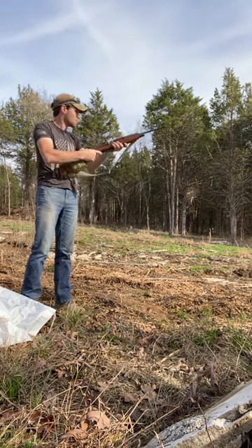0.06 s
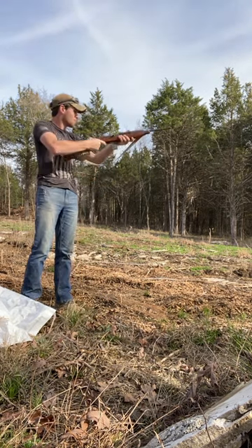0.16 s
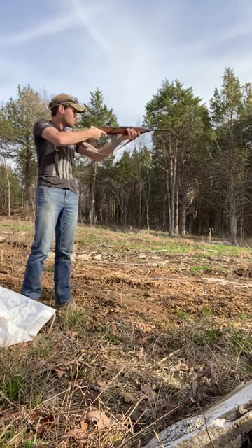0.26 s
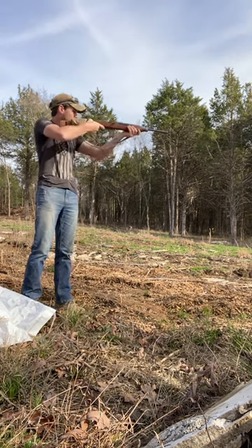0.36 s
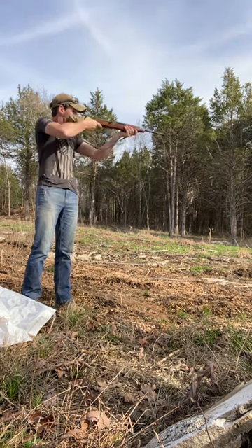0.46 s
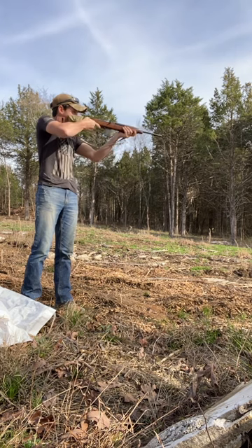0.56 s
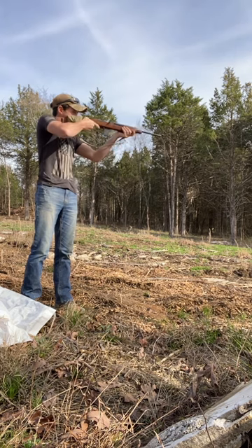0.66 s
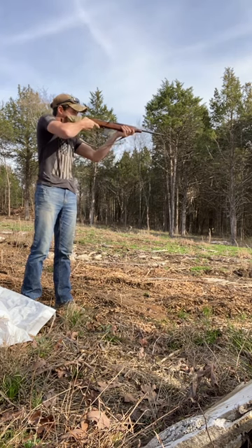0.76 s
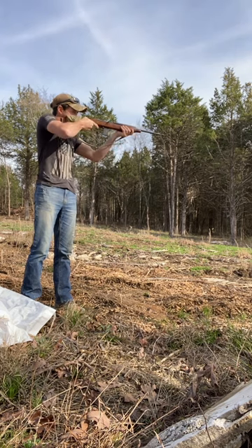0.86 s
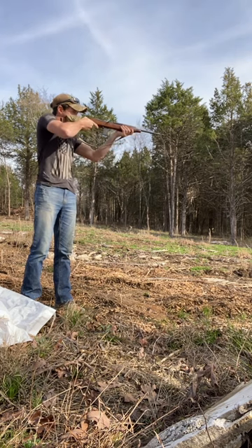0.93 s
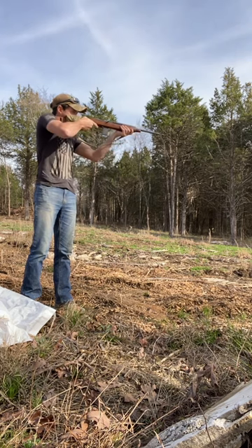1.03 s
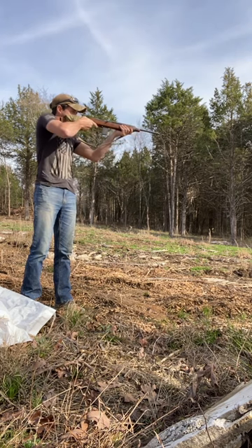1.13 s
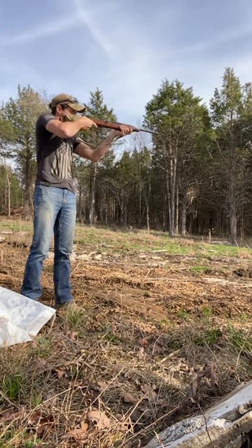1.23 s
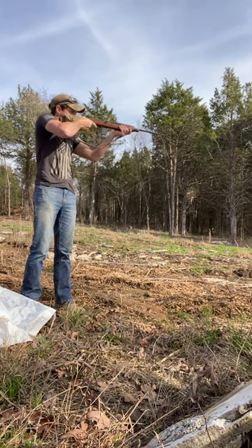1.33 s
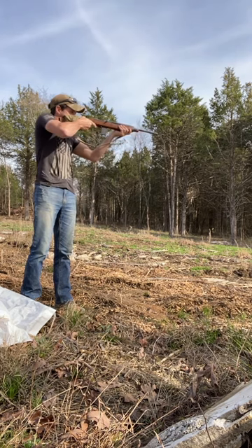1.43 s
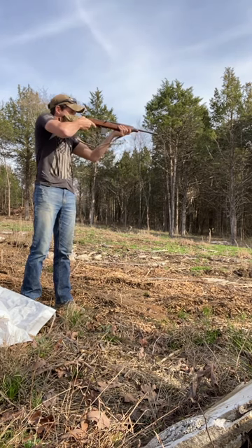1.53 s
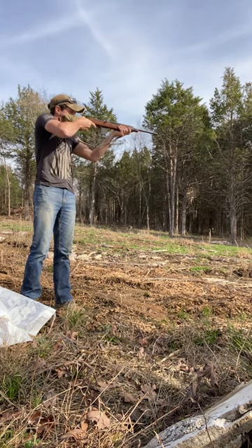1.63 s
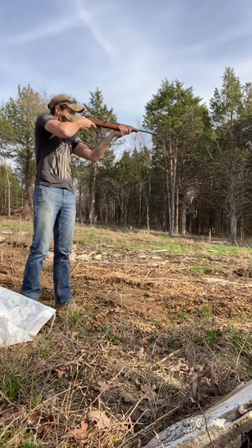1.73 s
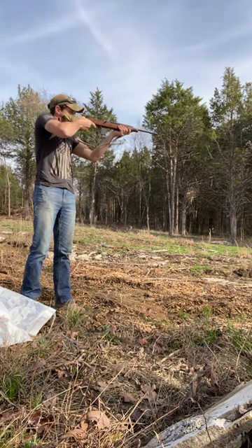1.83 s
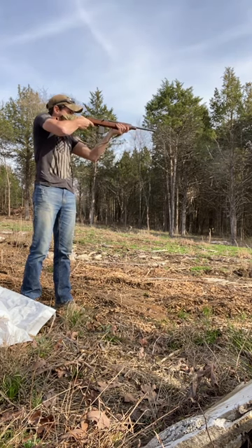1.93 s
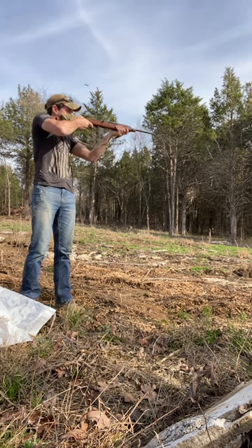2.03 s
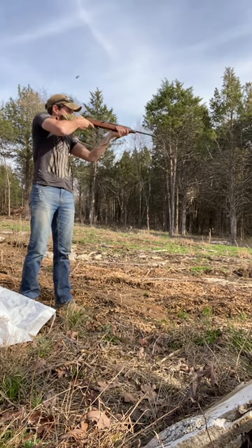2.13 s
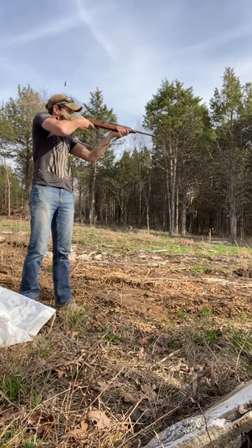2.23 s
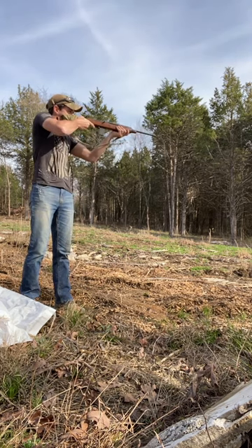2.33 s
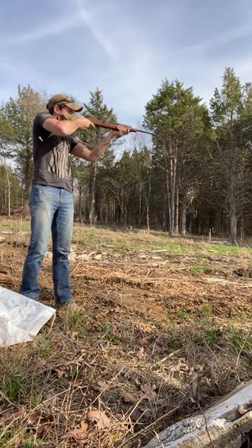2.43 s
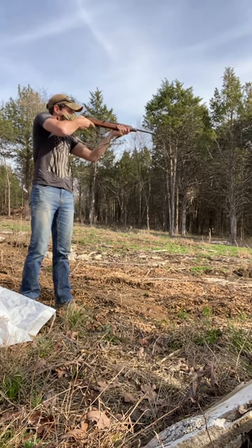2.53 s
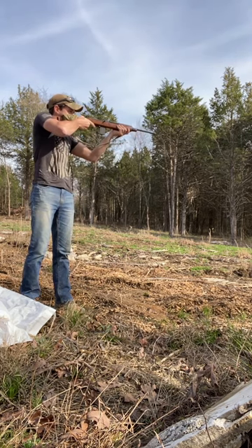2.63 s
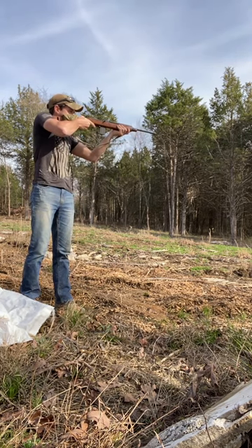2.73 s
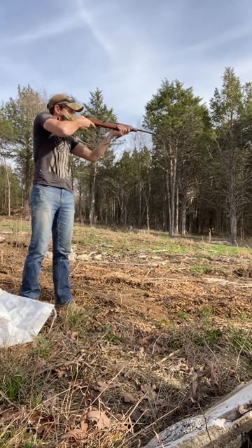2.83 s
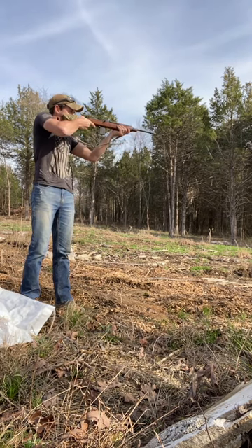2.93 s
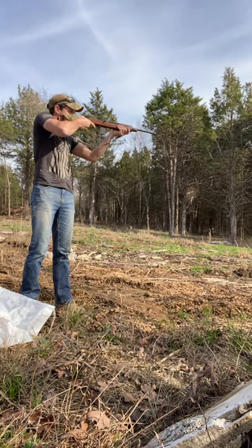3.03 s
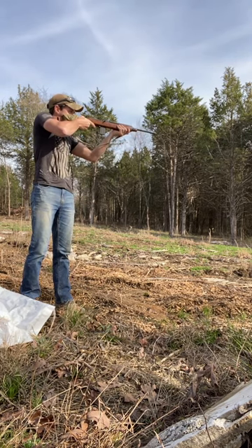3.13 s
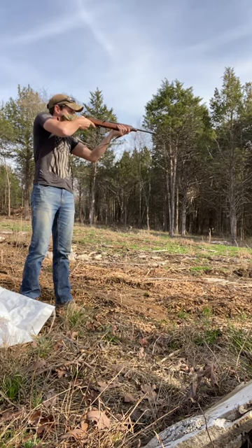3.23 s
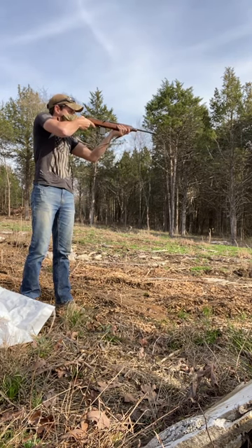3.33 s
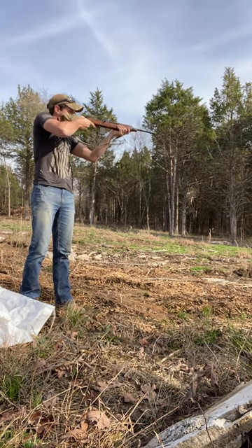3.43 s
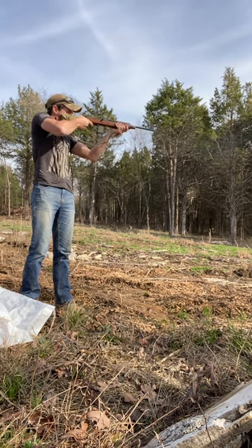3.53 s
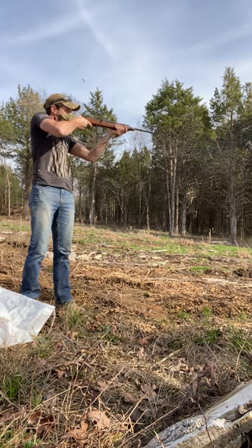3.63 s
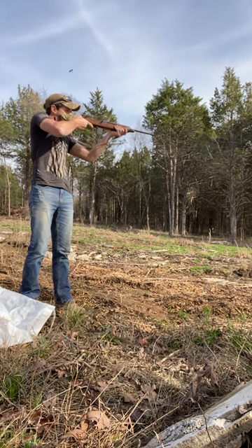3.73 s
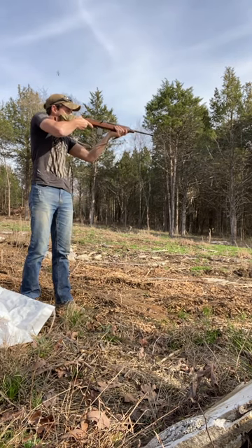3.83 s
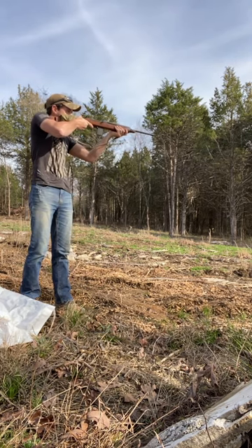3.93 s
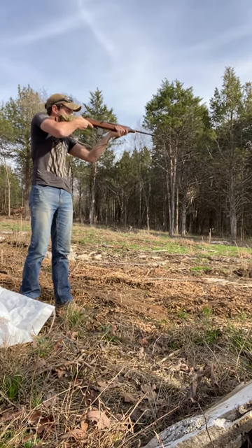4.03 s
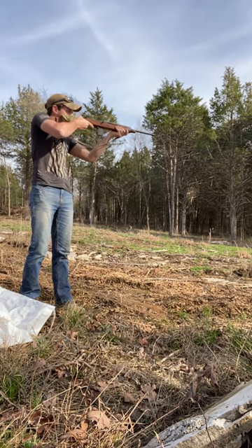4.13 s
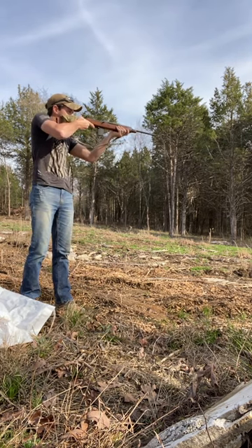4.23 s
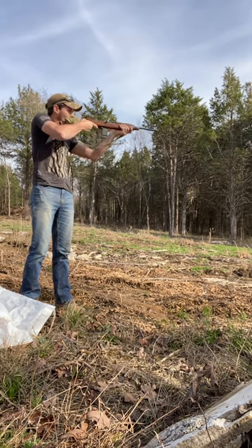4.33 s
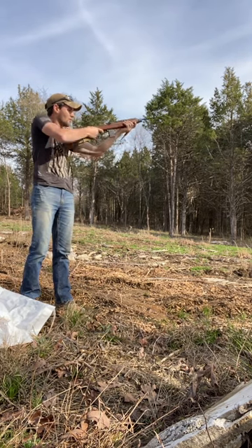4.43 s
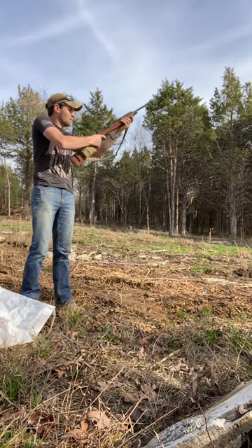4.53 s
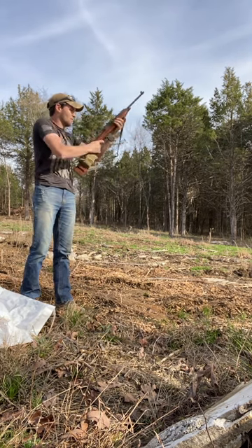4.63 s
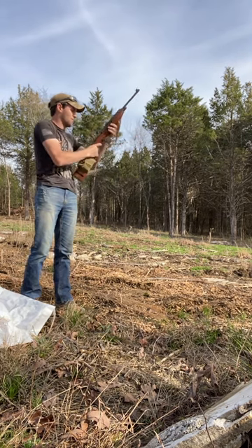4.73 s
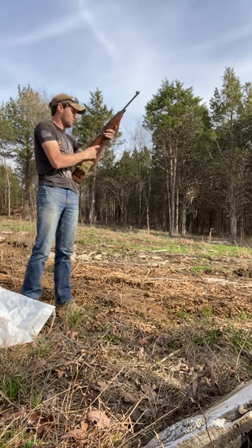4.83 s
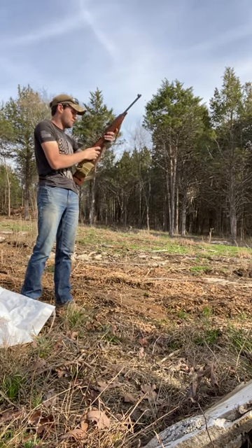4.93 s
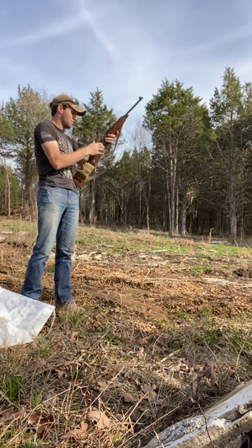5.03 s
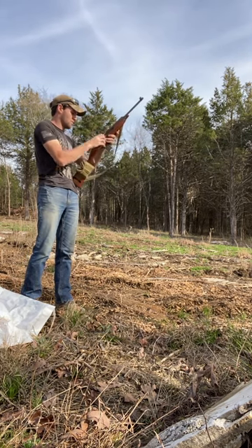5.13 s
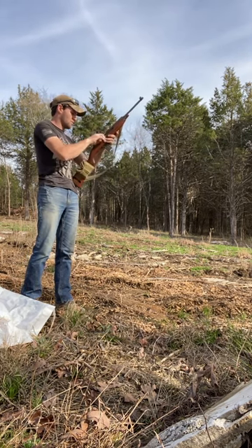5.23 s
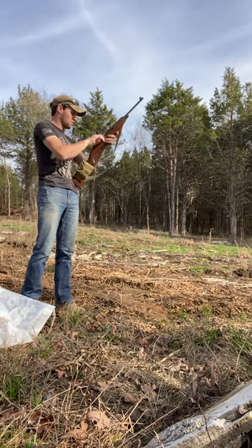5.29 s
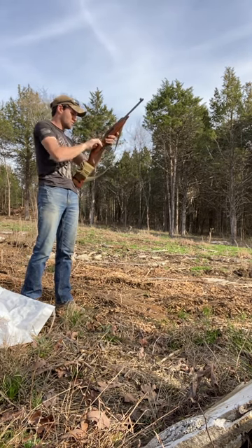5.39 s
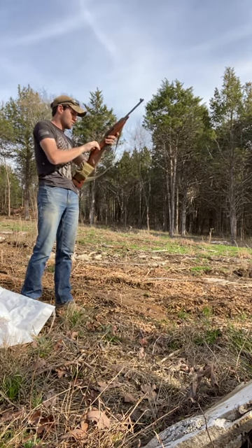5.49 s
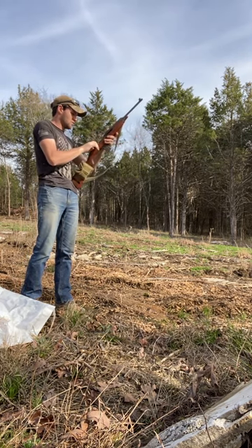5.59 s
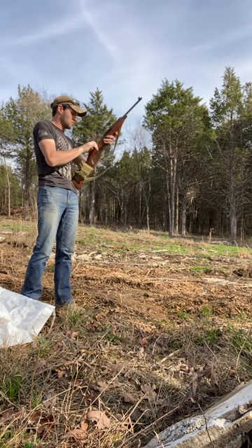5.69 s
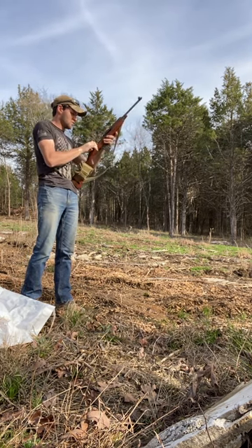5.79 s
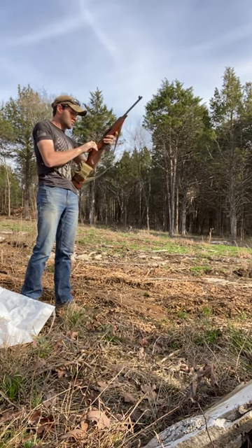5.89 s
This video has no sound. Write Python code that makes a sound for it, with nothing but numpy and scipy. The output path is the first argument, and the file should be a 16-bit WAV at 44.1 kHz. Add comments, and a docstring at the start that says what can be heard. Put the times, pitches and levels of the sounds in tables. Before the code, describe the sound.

A rifle is shouldered over low rumble, fires two sharp overloaded cracks with long dulling echoes, and its action clicks afterward.

```python
"""Over a low rumble, soft air and wind puffs (filtered noise), a rifle is shouldered: cloth slides, stock taps.
Two carbine shots sound, with one faint falling chirp before them and another after: each shot is a noise
swell with unsteady tones, a shock front and a thump, then a bolt snap, a ground tail, a long roll from the
woods that dulls with age and a hillside swell. Spent cases land as gritty noise with a thud, the first before
the second shot. At the end the rifle is lowered and its steel action clicks: noise snaps with damped modes."""
import sys
import numpy as np
from scipy import signal
from scipy.io import wavfile

SR = 44100
rng = np.random.default_rng(int(sys.argv[2]) if len(sys.argv) > 2 else 0)


def waveform_to_disk(signal):
    """Save audio, clipped to [-1, 1], as 16-bit WAV at the path in sys.argv[1]."""
    frames = np.transpose(np.atleast_2d(signal))
    scaled = np.clip(frames, -1, 1) * 32767
    samples = np.round(scaled).astype(np.int16)
    wavfile.write(sys.argv[1], SR, samples)


N = 262565   # samples
TIME_S = np.arange(N) / SR
EDGES_HZ = 20 * 2 ** np.arange(0, 9.7, 1 / 3)   # third octaves
CENTRES_HZ = np.sqrt(EDGES_HZ[1:] * EDGES_HZ[:-1])


def from_db(db):
    """Amplitude ratio of a level in dB."""
    return 10 ** (np.asarray(db) / 20)


def left_right(lean_db):
    """Left and right gains that differ by lean_db."""
    return from_db([[lean_db / 2], [-lean_db / 2]])


def at_bands(points):
    """A table over frequency, read at the band centres."""
    hz, value = np.transpose(points)
    return np.interp(np.log(CENTRES_HZ), np.log(hz), value)


def tilted(colour, tilt_db_per_octave):
    """A colour at the band centres with its treble raised or lowered."""
    return np.c_[CENTRES_HZ, at_bands(colour) + tilt_db_per_octave * np.log2(CENTRES_HZ)]


def band_gains(colour):
    """Gain of each band for a colour of total power 1."""
    hz, density_db = np.transpose(colour)
    log_hz_inside = np.linspace(np.log(EDGES_HZ[:-1]), np.log(EDGES_HZ[1:]), 9)
    density = from_db(np.interp(log_hz_inside, np.log(hz), density_db)) ** 2
    power = np.mean(density, axis=0) * np.diff(EDGES_HZ)
    return np.sqrt(power / power.sum())


def drift(knots_per_s, size):
    """Random wander with spread about 1, linear between random knots."""
    knots = rng.standard_normal(4096)
    return 1.2 * np.interp(np.arange(size) / SR * knots_per_s, np.arange(len(knots)), knots)


# Stereo width of noise. Each row: frequency in Hz, left-right correlation.
LIKENESS = [(60, 0.94), (130, 1), (280, 0.91), (600, 0.34), (1280, 0.85), (2760, -0.37), (5930, 0.87),
            (12700, -0.38)]


def noise_bands(size, shared=1.0):
    """Third-octave bands of stereo noise, rms 1 each; shared scales the left-right correlation."""
    run_in = 6000   # samples for the filters to settle
    white = rng.standard_normal((2, 2, size + run_in))
    for k, alike in enumerate(np.clip(shared * at_bands(LIKENESS), -.99, .99)):
        sos = signal.butter(2, EDGES_HZ[k:k + 2], "band", fs=SR, output="sos")
        mid, side = signal.sosfilt(sos, white[k % 2])[:, run_in:]
        band = np.sqrt(1 + alike) * mid + np.sqrt(1 - alike) * side * [[1], [-1]]
        yield band / band.std()


def noise(colour, size):
    """Stereo noise of one colour, rms about 1."""
    return sum(gain * band for gain, band in zip(band_gains(colour), noise_bands(size)))


def ring(t, hz, t60_s):
    """A sine that starts at t = 0 and loses 60 dB in t60_s."""
    t = np.maximum(t, 0)
    return np.sin(2 * np.pi * hz * t) * from_db(-60 * t / t60_s)


def swell(t, crest_s, build_s, dying_db_per_s, hold_s=0):
    """Builds up to 1 at the crest, holds, then dies at a steady rate."""
    rise = np.clip((t - crest_s) / build_s + 1, 0, 1) ** 2
    return rise * from_db(-dying_db_per_s * np.maximum(t - crest_s - hold_s, 0))


def contact(t, colour, rise_s, decay_s, tail_db, tail_s, grit_db=1.0):
    """A brief gritty touch with a faint tail from the ground around."""
    shape = np.exp(-np.maximum(t - rise_s, 0) / decay_s) + from_db(tail_db) * np.exp(-t / tail_s)
    grit = from_db(grit_db * drift(690, len(t)))
    return np.minimum(t / rise_s, 1) ** 2 * shape * grit * noise(colour, len(t))


def add(out, start_s, sound):
    """Mixes a sound in from the given time on."""
    i = int(start_s * SR)
    out[:, i:i + sound.shape[-1]] += sound[..., :N - i]


# Spectra of far rumble, air in the trees, wind puffs. Each row: frequency in Hz, density in dB per Hz.
RUMBLE_COLOUR = [(12, -48), (20, -21), (43, -11), (81, 4), (97, 0), (114, -15), (144, -6), (350, -30),
                 (460, -66), (770, -120)]
AIR_COLOUR = [(180, -28.5), (300, 3.5), (411, -17.5), (505, 1), (749, -13), (823, -7), (905, -10.5),
              (995, -11.5), (1250, -18.5), (1600, -34.5), (2090, -47), (2410, -28), (2910, -37.5),
              (6500, -38.5), (11500, -42), (13000, -57.5)]
PUFF_COLOUR = [(20, -16), (45, -5), (70, 5.5), (120, -14.5), (250, -31.5), (600, -85)]
# Low puffs of wind. Each row: centre in seconds, level in dB, half length to 1/e in seconds.
PUFFS = [(1.52, -39.5, 0.074), (1.689, -29, 0.057), (2.652, -52, 0.12), (3.692, -45.5, 0.057),
         (5.494, -64.5, 0.028)]
# Lasting drops near each shot, adding up. Each row: start in seconds, rumble change in dB, air change in dB.
HUSHES = [(1.82, -14.5, -21), (3.45, -11, -5)]
RUMBLE_DB, RUMBLE_WAVER_DB, RUMBLE_WAVER_KNOTS_PER_S = -45, 1.67, 5.9
AIR_DB, HUSH_FALL_S = -61.5, .17


def background():
    """Far rumble, soft air in the trees and wind puffs: one noise, its band powers summed."""
    rumble_change_db, air_change_db = 0, 0
    for start_s, rumble_db, air_db in HUSHES:
        fallen = np.clip((TIME_S - start_s) / HUSH_FALL_S, 0, 1)
        rumble_change_db = rumble_change_db + rumble_db * fallen
        air_change_db = air_change_db + air_db * fallen
    waver_db = RUMBLE_WAVER_DB * drift(RUMBLE_WAVER_KNOTS_PER_S, N)
    rumble = from_db(RUMBLE_DB + waver_db + rumble_change_db)
    air = from_db(AIR_DB + air_change_db)
    wind = sum(from_db(db) * np.exp(-((TIME_S - s) / half_s) ** 2) for s, db, half_s in PUFFS)
    gains = zip(band_gains(RUMBLE_COLOUR), band_gains(AIR_COLOUR), band_gains(PUFF_COLOUR))
    out = 0
    for band, (rumble_gain, air_gain, wind_gain) in zip(noise_bands(N), gains):
        power = (rumble_gain * rumble) ** 2 + (air_gain * air) ** 2 + (wind_gain * wind) ** 2
        out = out + band * np.sqrt(power)
    return out


# Spectra of sliding sling and sleeve, and of the stock tap. Each row: frequency in Hz, density in dB per Hz.
SLIDE_COLOUR = [(1500, -12), (2600, 2), (3800, -9), (5200, 3.5), (6300, -16), (7600, 3), (9000, -3.5),
                (12500, -1.5)]
TAP_COLOUR = [(600, 0), (1500, 5), (2400, -13), (4000, -9), (7500, -23), (12000, -26)]
SLIDE_CREST_S, SLIDE_DB = .16, -71
SLIDE_BUILD_S, SLIDE_HOLD_S, SLIDE_DYING_DB_PER_S = 0.13, .13, 200
TAP_S, TAP_DB = .154, -55.5
STOCK_HZ, STOCK_DB, STOCK_T60_S = 1470, -62, .06


def shouldering():
    """Cloth slides as a noise swell; the wooden stock taps and rings briefly as the rifle comes up."""
    out, t = np.zeros((2, N)), np.arange(SR // 8) / SR
    add(out, TAP_S, from_db(STOCK_DB) * ring(t, STOCK_HZ, STOCK_T60_S))
    slide = swell(TIME_S[:SR], SLIDE_CREST_S, SLIDE_BUILD_S, SLIDE_DYING_DB_PER_S, SLIDE_HOLD_S)
    add(out, 0, from_db(SLIDE_DB) * slide * noise(SLIDE_COLOUR, SR))
    tap = contact(t, TAP_COLOUR, rise_s=0.0029, decay_s=0.0071, tail_db=-21, tail_s=.02)
    add(out, TAP_S, from_db(TAP_DB) * tap)
    return out


# Faint chirps, perhaps a far bird. Each row: centre in seconds, pitch there in Hz, level in dB.
CHIRPS = [(.70, 2380, -76), (4.215, 2230, -50.5)]


def chirps(half_s=0.0053, fall_hz_per_s=5000):
    """Brief whistles that slide down in pitch under a bell-shaped level."""
    out = 0
    for centre_s, hz, db in CHIRPS:
        t = TIME_S - centre_s
        tone = np.sin(2 * np.pi * (hz - fall_hz_per_s * t / 2) * t)
        out = out + from_db(db) * np.exp(-(t / half_s) ** 2) * tone
    return out


def surge(t, hz, swell_s, power, bass_lag_s=.009, fall_s=0.0042, treble_hz=9000):
    """Level of a blast at one pitch: the treble swells most steeply, the bass crests last."""
    age = t - swell_s - bass_lag_s * np.sqrt(100 / max(hz, 60))   # bass_lag_s holds at 100 Hz
    rise = np.clip(1 + age / swell_s, 0, 1) ** (power * (1 + hz / treble_hz))
    return rise * np.exp(-np.maximum(age, 0) / fall_s)


# Spectrum of each blast, one list per shot. Each row: frequency in Hz, density in dB per Hz.
BLAST_COLOURS = [
    [(35, -39), (60, -2), (319, -11), (468, -7.5), (751, -3.5), (880, -1.5), (1770, -23), (2030, -13.5),
     (2370, -4.5), (3810, -24.5), (4170, -16), (5720, -22), (7340, -27.5), (12300, -35), (13200, -42)],
    [(35, -31.5), (60, 9), (132, -1.5), (232, -14.5), (627, -4.5), (1230, -7.5), (2070, -8.5), (2430, -2.5),
     (2910, -11), (3180, -7.5), (4780, -30.5), (5350, -29), (6860, -19), (7670, -18.5), (13200, -34)],
]
# Pitches that stand out, one list per shot. Each row: pitch in Hz, pitch wander in tenths of Hz,
# level in dB (used relative to the strongest).
BLAST_PEAKS = [
    [(446.5, 140, -2), (889, 27, -3), (973, 16, -6), (1927, 21, -12), (2103, 32, -7), (2410, 210, -6),
     (2610, 43, -8.5)],
    [(400.3, 300, 2), (2226, 34, -4), (2420, 99, -1), (2675, 47, -2.5), (3140, 49, -8)],
]
# Side each blast leans to, one list per shot. Each row: frequency in Hz, left over right in dB.
BLAST_LEANS = [
    [(60, -11), (110, -10), (200, -14), (360, -13.5), (650, -0.5), (1180, 7.5), (2140, 1), (3870, -4),
     (7020, 2), (12700, -8.5)],
    [(60, -1), (110, -0.5), (200, 5.5), (360, -14), (650, -17.5), (1180, -5), (2140, 2.5), (3870, 2.5),
     (7020, -3), (12700, 1.5)],
]


def blast(level_db, swell_s, power, colour, peaks, lean, tones_db=-4.0):
    """A noise burst swells to a crest and collapses, with a few pitches standing out."""
    t, roar, tones = np.arange(SR // 8) / SR, 0, 0
    bands = noise_bands(len(t), shared=-0.11)
    for hz, gain, lean_db, band in zip(CENTRES_HZ, band_gains(colour), at_bands(lean), bands):
        shape = surge(t, hz, swell_s, power)
        burst = band * shape
        burst *= np.linalg.norm(shape) / np.linalg.norm(burst, axis=1, keepdims=True)   # exact energy
        sides = left_right(lean_db)
        roar = roar + gain * burst * sides / np.sqrt(np.mean(sides ** 2))
    strongest_db = np.max(peaks, axis=0)[2]
    for hz, wander_tenths_hz, db in peaks:
        wander_cycles = np.cumsum(drift(60, len(t))) * wander_tenths_hz / (10 * SR)
        tone = np.sin(2 * np.pi * (hz * t + rng.random() + wander_cycles))
        sides = left_right(np.interp(hz, CENTRES_HZ, at_bands(lean)))
        sides = sides / np.linalg.norm(sides)
        tones = tones + from_db(db - strongest_db) * tone * surge(t, hz, swell_s, power) * sides
    return from_db(level_db) * (roar + from_db(tones_db) * tones)


def pressure_wave(crack_db, thump_db, swing_db, lean_db, left_late_s,
                  crack_s=0.0007, bounce_s=0.0061, bounce_db=-3, start_hz=380, thump_hz=68,
                  glide_s=0.0023, thump_s=0.011, swing_delay_s=.033, swing_hz=52, swing_t60_s=0.1):
    """A shock front and its bounce off the ground, then a thump that drops in pitch and a slow after-swing."""
    t = np.arange(SR // 4) / SR

    def front(u):
        return (u > 0) * (1 - u / crack_s) * np.exp(-u / crack_s)

    crack = front(t) + from_db(bounce_db) * front(np.maximum(t - bounce_s, 0))
    u = np.maximum(t - bounce_s / 2 - np.array([[left_late_s], [0]]), 0)
    cycles = thump_hz * u + (start_hz - thump_hz) * glide_s * (1 - np.exp(-u / glide_s))
    thump = np.sin(2 * np.pi * cycles) * np.exp(-u / thump_s) * left_right(lean_db)
    swing = ring(t - swing_delay_s, swing_hz, swing_t60_s)
    return from_db(crack_db) * crack + from_db(thump_db) * thump + from_db(swing_db) * swing


# Spectrum of rough ground nearby. Each row: frequency in Hz, density in dB per Hz.
SCATTER_COLOUR = [(88, -36), (150, -7.5), (198, -6), (668, -2.5), (761, -18), (952, -7.5), (8950, -19.5),
                  (11800, -21), (13000, -42.5)]


def ground_scatter(near_db=-18, near_s=.015, far_db=-37, far_s=0.071, grain_db=2.0):
    """Clods and stubble throw back a short grainy tail with a fast and a slow decay."""
    t = np.arange(SR // 3) / SR
    shape = from_db(near_db) * np.exp(-t / near_s) + from_db(far_db) * np.exp(-t / far_s)
    return shape * from_db(grain_db * drift(400, len(t))) * noise(SCATTER_COLOUR, len(t))


# Spectrum of steel clicks before tilt, for bolt() and action(). Each row: frequency in Hz, density in dB per Hz.
CLICK_COLOUR = [(240, -57), (400, -25), (639, -2.5), (843, -40), (1080, 4), (1450, -2), (1860, -7.5),
                (7140, -12), (13200, -30)]
BOLT_DELAY_S, BOLT_DB = 0.068, -38.5


def bolt(tilt_db_per_octave=8.0, decay_s=0.0064):
    """The action closes on the next round with one bright snap."""
    colour = tilted(CLICK_COLOUR, tilt_db_per_octave)
    snap = contact(TIME_S[:SR // 8], colour, rise_s=0.0024, decay_s=decay_s, tail_db=-20, tail_s=.02)
    return from_db(BOLT_DB) * snap


# Spectrum of the woods' echo. Each row: frequency in Hz, density in dB per Hz.
ROLL_COLOUR = [(24, -38), (40, -19.5), (108, -5.5), (141, -6.5), (228, -3.5), (389, -12), (439, 0),
               (930, -6), (1370, 0.5), (2630, -8.5), (3270, -10), (9260, -28.5), (11200, -40), (13000, -62)]
# Loss through air and foliage. Each row: frequency in Hz, loss in dB per unit of path (seconds ** loss_power).
PATH_LOSS = [(50, -12), (130, -6.5), (280, 6.5), (550, -6.5), (1200, -3), (2400, -3), (4000, 11.5),
             (6500, 38.5), (9000, 57), (12000, 71)]
# Brief bumps and dips in the roll. Each row: delay in seconds, level change in dB.
ROLL_BUMPS = [(0.0896, 0.5), (0.096, -3), (0.1146, -9), (.628, 7.5), (0.764, 12), (0.859, 3)]
# Stands of trees answering every shot. Each row: crest delay in seconds, level in dB, build-up in seconds,
# dying in dB per second.
STANDS = [(0.09, -32, 0.011, 39), (.116, -32.5, 0.016, 100), (0.249, -30, 0.038, 214),
          (0.304, -32.5, 0.024, 50.5), (0.373, -36.5, 0.13, 56), (0.524, -48, .015, 260),
          (.625, -45.5, .03, 194), (.9, -52.5, 0.4, 22.5)]
LATE_FROM_S = 0.25


def roll(late_db, loss_power=0.82, colour_age_s=.27, grain_db=1.93, patchy_db=1.2, bump_s=0.00082):
    """Stands of trees return the shot from countless trunks; the later an echo, the more treble it has lost."""
    age = TIME_S
    power = sum((from_db(db) * swell(age, delay_s, build_s, dying)) ** 2
                for delay_s, db, build_s, dying in STANDS)
    level_db = np.where(age > LATE_FROM_S, late_db, 0)
    level_db = level_db + grain_db * drift(450, N) / (1 + age)   # single echoes merge as they crowd
    for delay_s, change_db in ROLL_BUMPS:
        level_db = level_db + change_db * np.exp(-((age - delay_s) / bump_s) ** 2)
    path = age ** loss_power - colour_age_s ** loss_power   # 0 where ROLL_COLOUR holds
    out = 0
    for gain, loss_db, band in zip(band_gains(ROLL_COLOUR), at_bands(PATH_LOSS), noise_bands(N)):
        out = out + gain * band * from_db(patchy_db * drift(22, N) - loss_db * path)
    return out * np.sqrt(power) * from_db(level_db)


# Spectrum of the hillside echo. Each row: frequency in Hz, density in dB per Hz.
HILL_COLOUR = [(50, -14.5), (90, 5), (180, -7.5), (350, -3.5), (520, 5.5), (800, -12.5), (1300, -11.5),
               (2500, -55)]
HILL_DELAY_S, HILL_DB, HILL_BUILD_S, HILL_DYING_DB_PER_S = 0.8, -51, 0.034, 33.5


def hillside(late_db):
    """A far hillside returns a dull, hollow swell: mostly bass and low middle survive the way."""
    age = TIME_S[:3 * SR]
    shape = swell(age, HILL_DELAY_S, HILL_BUILD_S, HILL_DYING_DB_PER_S)
    return from_db(HILL_DB + late_db) * shape * noise(HILL_COLOUR, len(age))


# Spent cases land and bounce. Each row: time in seconds, level in dB before trim, decay in seconds,
# thud in dB against the level, treble tilt in dB per octave.
CASES = [(2.6885, -37, 0.008, 9, 1), (4.3004, -39.5, 0.0066, -18, 0), (4.364, -61, 0.006, -9, 3),
         (4.565, -63, 0.0056, -8, 2), (4.5844, -75, 0.006, -8, 1)]
# Spectrum of the landing before tilt. Each row: frequency in Hz, density in dB per Hz.
CASE_COLOUR = [(200, 1), (1500, 2), (4000, -15.5), (6500, -3.5), (9000, -14.5), (13000, -23)]


def cases(trim_db=-5.5, thud_hz=170, thud_t60_s=0.031, thud_delay_s=.02):
    """Brass cases drop into dry stalks (gritty crunch) and soft soil (low thud)."""
    out, t = np.zeros((2, N)), np.arange(SR // 3) / SR
    for s, db, decay_s, thud_db, tilt_db in CASES:
        colour = tilted(CASE_COLOUR, tilt_db)
        crunch = contact(t, colour, rise_s=0.0032, decay_s=decay_s, tail_db=-25, tail_s=0.056)
        thud = from_db(thud_db) * ring(t - thud_delay_s, thud_hz, thud_t60_s)
        add(out, s - .002, from_db(db + trim_db) * (crunch + thud))
    return out


# Handling the action. Each row: time in seconds, level in dB before trim, decay in seconds,
# ring in dB against the level, treble tilt in dB per octave.
CLICKS = [(5.2165, -62, 0.0043, -24, 10), (5.299, -45.5, 0.0039, -23, 2.5), (5.3173, -46, 0.012, -8.5, 1.5),
          (5.3537, -46.5, 0.0043, -27, 0.5), (5.3943, -55, 0.0039, -18, -5.5),
          (5.4167, -52, 0.012, -16, -3), (5.4504, -42, 0.0033, -24, 5), (5.9306, -54, 0.0064, -17, -1)]
# Ringing modes of the steel. Each row: pitch in Hz, level in dB before random spread, 60 dB decay in seconds.
STEEL = [(1420, 0, 0.16), (1920, -8, .12), (3950, -1.5, 0.15), (4030, -8.5, 0.41), (5949, -26, .4),
         (9200, -12, 0.24)]


def action(trim_db=-3.0, uneven_db=8.0, mode_spread_db=2.2, choke_s=.008):
    """Steel parts snap together, each with its own colour, and ring until the next touch damps them."""
    out, t = np.zeros((2, N)), np.arange(SR // 2) / SR
    next_touches_s = [row[0] for row in CLICKS[1:]] + [N / SR]
    for (s, db, decay_s, ring_db, tilt_db), next_s in zip(CLICKS, next_touches_s):
        colour = tilted(CLICK_COLOUR, tilt_db)
        colour[:, 1] += rng.normal(0, uneven_db, len(CENTRES_HZ))
        snap = contact(t, colour, rise_s=0.0037, decay_s=decay_s, tail_db=-17.5, tail_s=.022)
        steel = sum(from_db(mode_db + rng.normal(0, mode_spread_db)) * ring(t, hz, t60_s)
                    for hz, mode_db, t60_s in STEEL)
        damping = np.exp(-np.maximum(s + t - next_s, 0) / choke_s)
        add(out, s - .001, from_db(db + trim_db) * (snap + from_db(ring_db) * steel * damping))
    return out


# The shots. Each row: crest in seconds (before bass lag), swell length in seconds, swell power, blast in dB,
# crack in dB, thump in dB, after-swing in dB, thump left over right in dB, thump lag on the left in seconds,
# late echoes in dB.
SHOTS = [(1.855, .030, 1.1, -7, 1.5, -11, -30.5, -13, 0.00046, 1.5),
         (3.4452, .018, 1.4, -7.5, -2.5, -13.5, -19.5, 5.5, .0026, -4.5)]


def scene():
    """Shots with their echoes, over the small sounds and the background."""
    out = background() + shouldering() + cases() + action() + chirps()
    for shot, colour, peaks, lean in zip(SHOTS, BLAST_COLOURS, BLAST_PEAKS, BLAST_LEANS):
        crest_s, swell_s, power, blast_db, *wave, late_db = shot
        add(out, crest_s - swell_s, blast(blast_db, swell_s, power, colour, peaks, lean))
        add(out, crest_s, pressure_wave(*wave))
        add(out, crest_s + BOLT_DELAY_S, bolt())
        add(out, crest_s, ground_scatter())
        add(out, crest_s, roll(late_db))
        add(out, crest_s, hillside(late_db))
    return out


def record(dry, ceiling=.84, cutoff_hz=12800):
    """The blasts overload the microphone, which rounds their peaks; a steep low-pass cuts the top."""
    rounded = dry / (1 + (dry / ceiling) ** 8) ** .125
    low_pass = signal.ellip(10, .2, 70, cutoff_hz, fs=SR, output="sos")
    return signal.sosfilt(low_pass, rounded)


dry = scene()
out = record(dry)
waveform_to_disk(out)
```